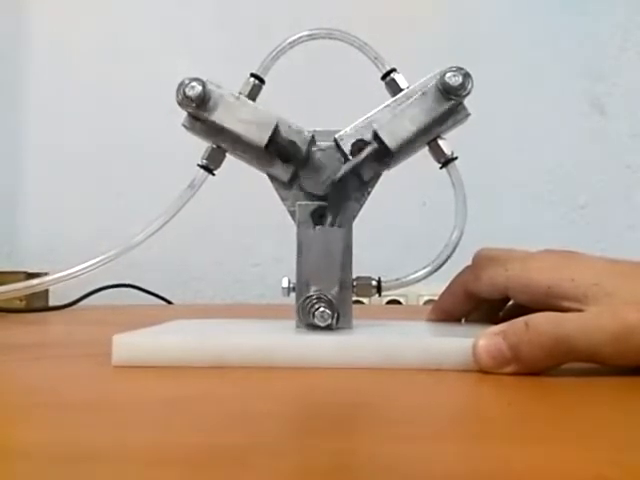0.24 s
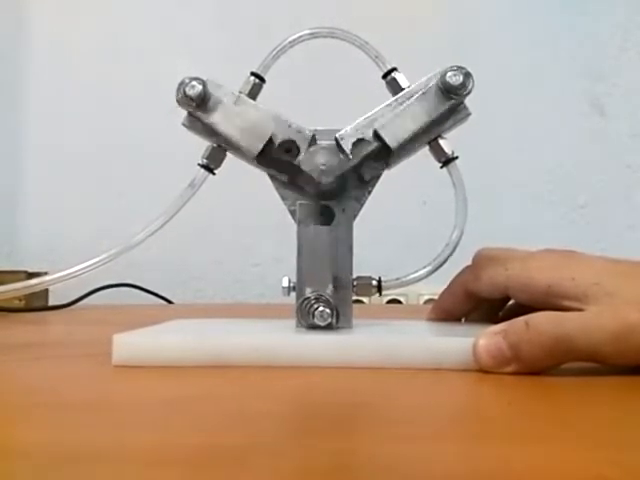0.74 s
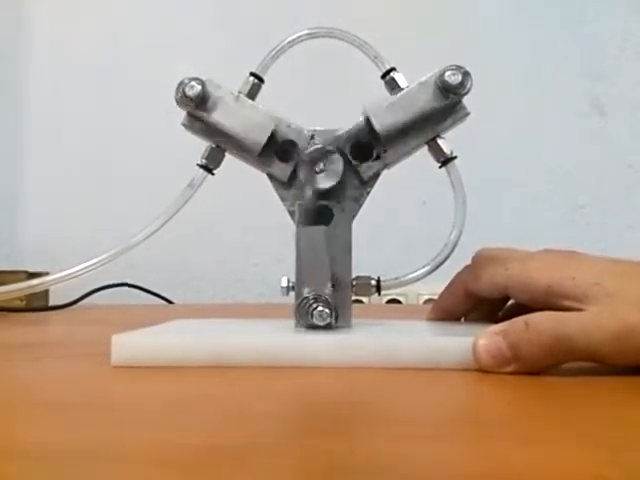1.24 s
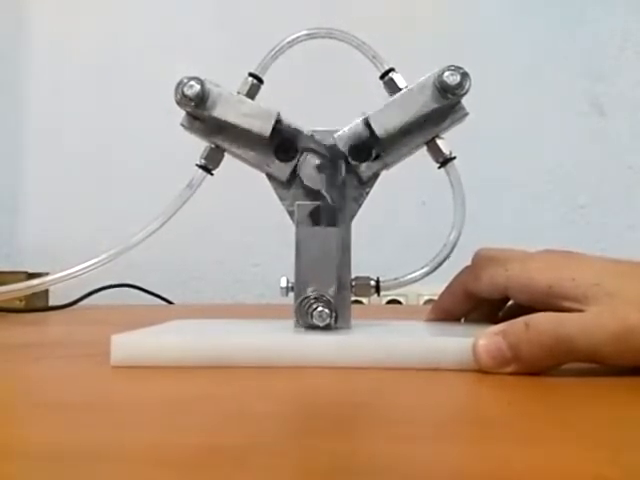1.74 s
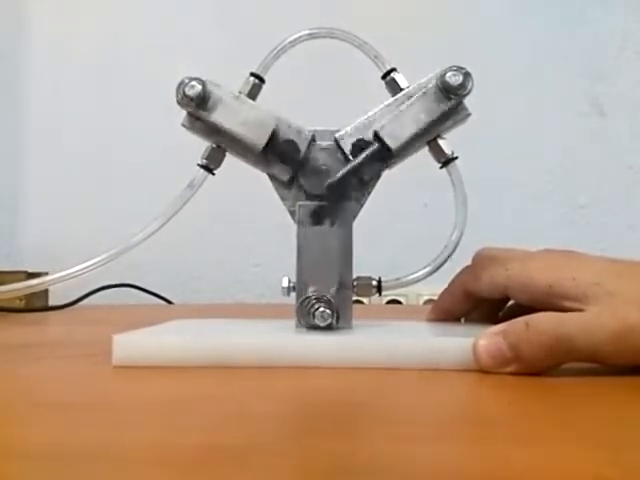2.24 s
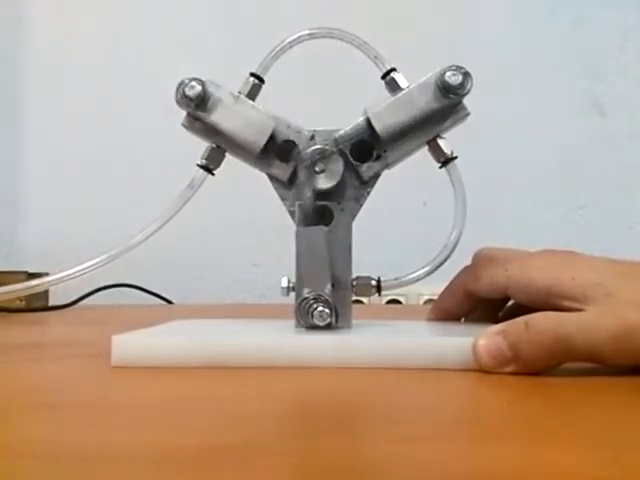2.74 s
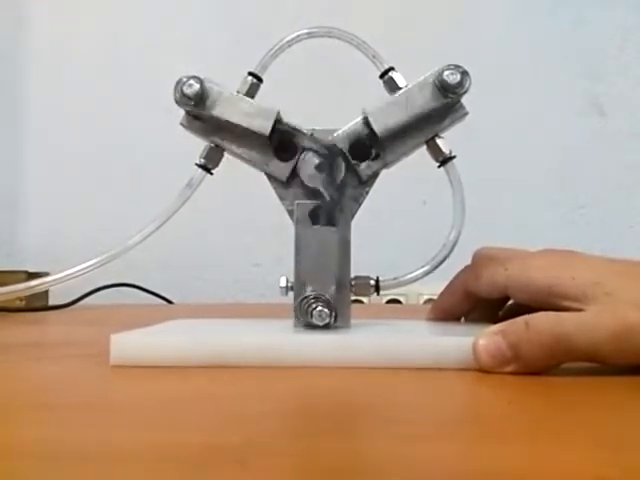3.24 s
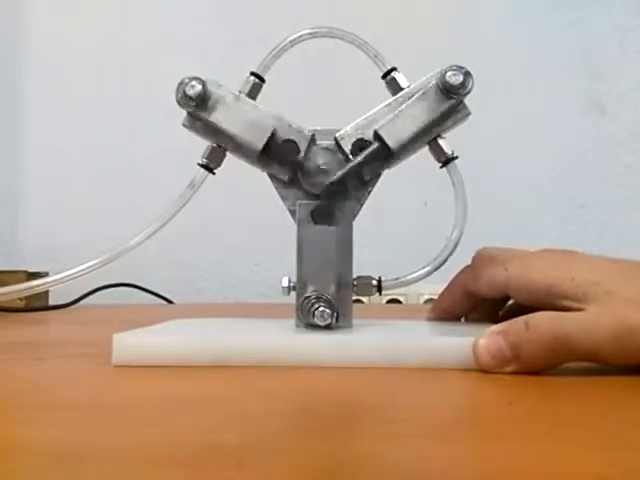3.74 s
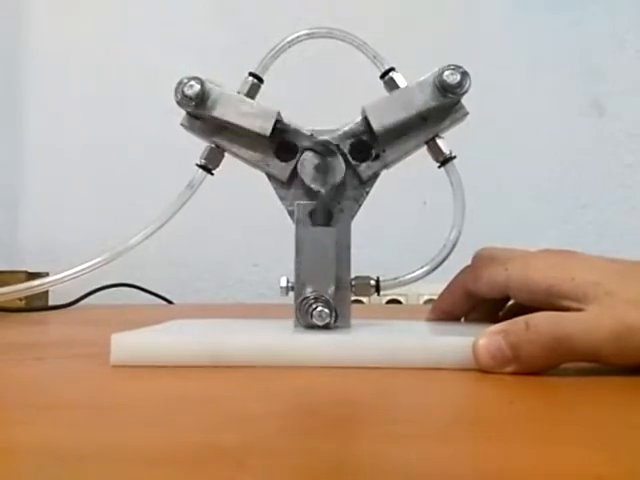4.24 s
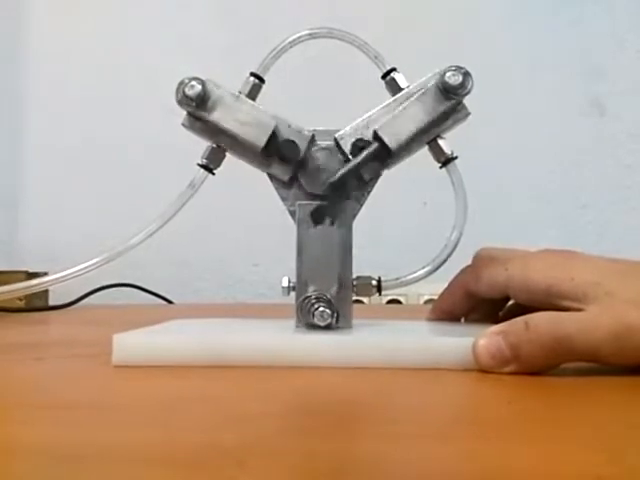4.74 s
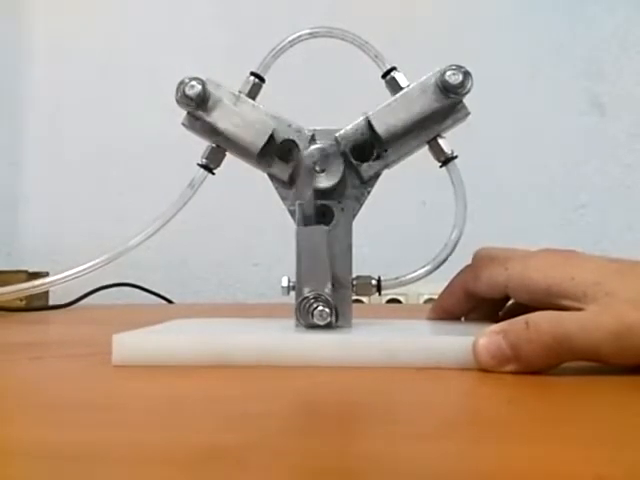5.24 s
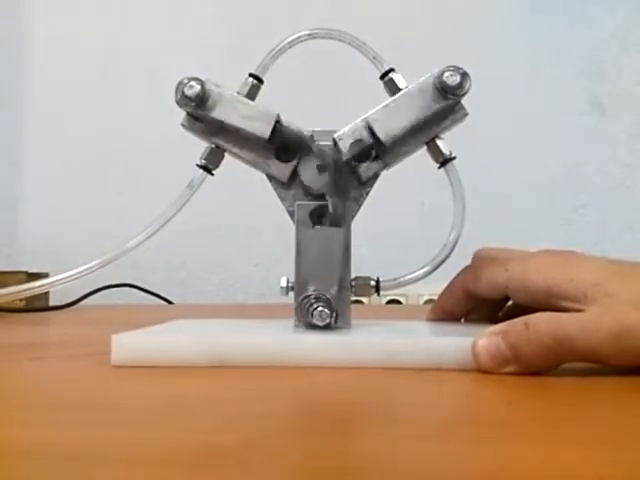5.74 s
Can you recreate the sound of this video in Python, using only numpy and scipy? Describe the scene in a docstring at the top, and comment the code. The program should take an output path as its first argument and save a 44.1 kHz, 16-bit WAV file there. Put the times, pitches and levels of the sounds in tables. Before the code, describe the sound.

A small compressed-air engine puffs almost five times a second, each sharp hiss sputtering out over a light table knock, with buzzing leaks between.

```python
"""On a table in a quiet room, a small three-cylinder compressed-air engine turns about 4.7 times a second, close to
a mono microphone. Once a turn a port snaps open: air flutters through it in fast pulses that ring near 8 kHz, then
breaks into slower sputters that knock the base against the table and set it swinging. Between the puffs the ports
leak with a rising buzz. Pulse trains and filtered noise make the air, resonances the knocks; a limiter holds the peaks."""
import sys
import numpy as np
from scipy import signal
from scipy.fft import rfft, irfft, next_fast_len
from scipy.io import wavfile
from scipy.ndimage import uniform_filter1d, minimum_filter1d, map_coordinates

SR = 44100
rng = np.random.default_rng(int(sys.argv[2]) if len(sys.argv) > 2 else 0)


def waveform_to_disk(signal):
    """Save audio, clipped to [-1, 1], as 16-bit WAV at the path in sys.argv[1]."""
    frames = np.transpose(np.atleast_2d(signal))
    scaled = np.clip(frames, -1, 1) * 32767
    samples = np.round(scaled).astype(np.int16)
    wavfile.write(sys.argv[1], SR, samples)


N = 263718
TIME = np.arange(N) / SR


def amp(db):
    """Decibels to gain."""
    return 10 ** (np.asarray(db) / 20)


def unit(x):
    """Scaled to rms 1."""
    return x / np.sqrt(np.mean(x ** 2) + 1e-20)


def noise():
    """White noise."""
    return rng.standard_normal(N)


def wobble(rate):
    """A smooth random curve through rate knots a second."""
    knots = rng.standard_normal(int(N * rate / SR) + 4)
    return map_coordinates(knots, [TIME * rate])


def filtered(x, response):
    """x times a complex response of frequency."""
    size = 2 * next_fast_len(N // 2 + SR // 4)
    return irfft(rfft(x, size) * response(np.fft.rfftfreq(size, 1 / SR)), size)[:N]


def coloured(x, spectrum):
    """x through a causal filter drawn by (Hz, dB) points, at rms 1."""
    def response(hz):
        f, db = np.transpose(spectrum)
        log_gain = np.log(amp(np.interp(np.log(hz + 1), np.log(f), db)))
        # folding the cepstrum forward in time gives minimum phase
        cepstrum = irfft(log_gain)
        cepstrum[1:len(cepstrum) // 2] *= 2
        cepstrum[len(cepstrum) // 2 + 1:] = 0
        return np.exp(rfft(cepstrum))
    return unit(filtered(unit(x), response))


# Hiss of the quiet room: f/Hz, relative level/dB
ROOM_COLOUR = [(30, -20), (120, 6.5), (400, -13.5), (1500, -13.5), (8000, -18.5)]


def room_floor():
    """Steady, faint filtered noise under everything."""
    return amp(-49.5) * coloured(noise(), ROOM_COLOUR)


# Low rumble of air brushing the microphone: f/Hz, relative level/dB
DRAUGHT_COLOUR = [(8, 1), (15, 4), (26, -6.5), (45, -11), (90, -23), (250, -50)]
DRAUGHT_DB, DRAUGHT_FOLLOWS = -42.5, 0.83  # base level at an average shake; dB more for each dB of shake


def draught(age, shake_db):
    """Spent air brushes the microphone as low noise, strong during the puff and fullest in the gap after it."""
    brush = np.interp(age, [0, .06, .12, .17, .2], [0.57, 0.94, 0.88, 1.0, 0.57])
    level = amp(DRAUGHT_DB + DRAUGHT_FOLLOWS * (shake_db - shake_db.mean()))  # harder strokes blow more
    return level * brush * amp(2.2 * wobble(12)) * coloured(noise(), DRAUGHT_COLOUR)


# One puff a turn: t/s the port opens, t/s from then to the main sputter, relative level/dB of the table's shake
PUFF_TIMES = [(-.085, .09, -38.5), (0.125, .066, -46.5), (.337, .068, -45.5), (.561, .072, -35.5),
              (.802, .074, -43.5), (1.036, .076, -52), (1.254, .075, -49), (1.473, .076, -42.5),
              (1.689, .068, -45), (1.902, .069, -50), (2.117, .072, -41), (2.333, .071, -33),
              (2.56, .078, -38.5), (2.763, .077, -45), (2.989, .064, -43), (3.206, .077, -41),
              (3.418, .077, -39), (3.616, .076, -41), (3.827, .063, -40), (4.026, .077, -32),
              (4.218, .073, -39), (4.422, .065, -37.5), (4.625, .063, -43), (4.836, .069, -44),
              (5.06, .071, -52), (5.277, .063, -38), (5.461, .065, -45.5), (5.687, .072, -39),
              (5.891, .07, -39)]
# Course of one turn: share of the turn [0-1], relative level/dB of the leak, flutter f/Hz,
# relative level/dB of the buzz tone
TURN_COURSE = [(0, -26, 400.3, -51), (.15, -21.5, 429.6, -56), (.35, -23.5, 359.6, -71),
               (.68, -23.5, 219.9, -45.5), (.79, -24, 270.4, -55), (.87, -19, 335.1, -43.5),
               (1, -21.5, 389.6, -44)]


def crank():
    """Turns the engine: time since the port opened, length of this turn, the puff's and the turn's columns."""
    starts, *puff = np.transpose(PUFF_TIMES)
    which = np.maximum(np.searchsorted(starts, TIME, side="right") - 1, 0)
    gaps = np.diff(starts)
    period = np.append(gaps, np.median(gaps))[which]
    age = TIME - starts[which]
    share, *course = np.transpose(TURN_COURSE)
    puff_now = [column[which] for column in puff]
    turn_now = [np.interp(age / period, share, column) for column in course]
    return age, period, puff_now, turn_now


THROB_HZ, THROB_RISE_S, THROB_PEAK_S, THROB_FALL_S = 67.2, 0.024, 0.082, 0.051  # mean pitch; swell after opening


def throb(age, sputter_s, shake_db, gain_db=6.5):
    """The sputters set the table swinging; the swing builds through the puff and dies after it."""
    width = np.where(age < THROB_PEAK_S, THROB_RISE_S, THROB_FALL_S)
    swell = np.exp(-((age - THROB_PEAK_S) / width) ** 2 / 2)
    pitch = THROB_HZ * np.exp(.09 * wobble(4))
    swing = 2 * np.pi * (age - sputter_s) * pitch + 0.81 * wobble(25)
    return -amp(shake_db + gain_db) * swell * (np.cos(swing) + 0.29 * np.cos(2 * swing))


# Resonances of the table: f/Hz, width f/Hz, relative level/dB
TABLE_MODES = [(70.6, 28, -32), (129, 52, -4), (212, 97, -11), (476, 160, -16.5), (920, 370, -24.5),
               (1700, 560, -29.5)]
# The base hops on some strokes: t/s of the first hop, relative level/dB, number of hops
BASE_JOLTS = [(.6337, -23.5, 3), (.8056, -26.5, 2), (0.8617, -21, 3), (1.31, -22, 3), (1.5376, -18, 3),
              (2.191, -22.5, 3), (2.4022, -18, 2), (2.8071, -26.5, 3), (3.0513, -23, 2), (3.249, -22.5, 2),
              (3.46, -24, 3), (3.6702, -23.5, 2), (3.8758, -23.5, 3), (4.103, -21, 2), (4.277, -24.5, 2),
              (4.903, -25.5, 2), (5.6978, -24, 2), (5.7426, -24.5, 2)]
HOP_S, HOP_LOSS_DB = .0148, 2  # time between hops; each lands softer


def table_response(f):
    """Parallel resonances, each ringing longer the narrower it is."""
    return sum(amp(db) * 1j * f * width / (centre * centre - f * f + 1j * f * width)
               for centre, width, db in TABLE_MODES)


def knocks(gain_db=44, rattle=0.085, rattle_s=0.0052):
    """Jolts make the base hop and rattle: impulses with short noise tails strike the table's resonances."""
    blows = np.zeros(N + SR)
    t = np.arange(SR // 50) / SR
    for start, db, hops in BASE_JOLTS:
        for hop in range(round(hops)):
            contact = (t == 0) + rattle * rng.standard_normal(len(t)) * np.exp(-t / rattle_s)
            first = round((start + hop * HOP_S) * SR)
            blows[first:][:len(t)] -= amp(db + gain_db - hop * HOP_LOSS_DB) * contact
    return filtered(blows[:N], table_response)


RING_HZ, RING_AT_FLUTTER_HZ, RING_FOLLOWS = 8123, 337, 0.17  # centre pitch; flutter it belongs to; exponent


def port_ring_hz(flutter_hz):
    """The port rings a little higher as it flutters faster."""
    return RING_HZ * (flutter_hz / RING_AT_FLUTTER_HZ) ** RING_FOLLOWS


def flutter(rate_hz, ring_hz, drift=.16, jitter=.014, ring_s=0.013, chirp=0.068, scatter_db=0.76, stray=.02):
    """Port faces lift and close hundreds of times a second: a click, a rising ring, a spurt, and a faint tone."""
    rate = rate_hz * np.exp(drift * wobble(16) + jitter * wobble(150))
    cycles = np.cumsum(rate) / SR
    phase = cycles % 1
    since = phase / rate  # seconds into this pulse
    size = amp(scatter_db * rng.standard_normal(N))[cycles.astype(int)]  # one draw a pulse
    samples_off = ((cycles + .5) % 1 - .5) / rate * SR
    clicks = size * np.sinc(samples_off) * rate_hz ** -.5  # even power at any rate
    wander = 1 + stray * wobble(35)
    pitch = ring_hz * wander * (1 + chirp * (phase - .5))
    onset = 1 - np.exp(-since / 0.00011)
    ring = size * np.sin(2 * np.pi * pitch * since) * np.exp(-since / ring_s) * onset
    spurts = size * (np.exp(-since / .0015) + .35)
    tone = np.sin(2 * np.pi * cycles + 1.4 * wobble(130))
    return (unit(clicks), unit(ring), unit(spurts)), unit(tone)


def cavity(x, echo=0.86):
    """Air repeats itself after drifting milliseconds, so a comb of narrow lines slides through the hiss."""
    delay = .0029 * SR * np.exp(.14 * wobble(5))  # in samples
    fine = signal.resample_poly(x, 4, 1)  # oversampled for smooth fractional delays

    def late(times):
        return np.interp(np.arange(N) - times * delay, np.arange(4 * N) / 4, fine)
    return unit(x + echo * late(0.99) + echo ** 2 * late(2))


def shifting(x, patchy_db=2.0):
    """The colour of the hiss shifts in small random patches of time and frequency."""
    z = signal.stft(x, nperseg=512)[2]
    patch = np.outer(np.hanning(13), np.hanning(15))
    field = signal.fftconvolve(rng.standard_normal(z.shape), patch, "same")
    return signal.istft(z * amp(patchy_db * unit(field)), nperseg=512)[1][:N]


def air(pulses, spectrum, click_db, ring_db, rush_db):
    """Fluttering air of rms 1: a blend of clicks, port ring and turbulence."""
    clicks, ring, spurts = pulses
    turbulence = spurts * cavity(noise())
    rush = coloured(amp(click_db) * clicks + amp(rush_db) * turbulence, spectrum)
    return unit(shifting(rush + amp(ring_db) * ring))


def buzz(buzz_db, tone):
    """The flutter's own tone, unsteady in level, heard as the rising buzz."""
    return amp(buzz_db - 4.0 + 3.7 * wobble(35)) * tone


# Short spits of the leak between puffs: t/s, relative level/dB, length t/s before the fall
LEAK_SPITS = [(1.22, -27, .01), (4.175, -11, 0.0053)]


def spits():
    """Extra flow of the leak, in short bursts."""
    return sum(amp(db) * np.interp(TIME - start, [0, .001, length, length + 0.0036], [0.0073, 0.59, 0.44, 0.022])
               for start, db, length in LEAK_SPITS)


# Colour of the leaking ports: f/Hz, relative level/dB
LEAK_COLOUR = [(60, -15), (300, -23.5), (600, -16), (1300, -29.5), (2500, -20), (3500, -25), (5000, -17.5),
               (6500, -10), (8000, -1), (9300, -5.5), (11000, -12), (12800, -15.5), (14500, -11),
               (16000, -7.5)]


def leak(leak_db, pulses):
    """Air escapes past the ports all through the turn, with the flutter's pulses in it."""
    flow = amp(leak_db - 3.0 + 1.0 * wobble(14)) + spits()
    return flow * air(pulses, LEAK_COLOUR, click_db=-14, ring_db=-6.0, rush_db=0.5)


WHISTLE_HZ, WHISTLE_WIDTH_HZ, WHISTLE_DB = 8140, 110, -10  # level relative to the broad jet


def whistle(waver_db=3.5):
    """The wide-open port whistles: a narrow, breathy noise band that wavers in level."""
    band = filtered(noise(), lambda hz: 1 / (1 + ((hz - WHISTLE_HZ) / WHISTLE_WIDTH_HZ) ** 2))
    return amp(WHISTLE_DB) * unit(unit(band) * amp(waver_db * wobble(5.04)))


# Colour of the opening port: f/Hz, relative level/dB
PORT_COLOUR = [(100, -10.5), (600, -15), (2500, -15), (3400, -17), (4700, -21.5), (5400, -6.5),
               (6700, -0.5), (8400, 10), (9700, 3), (11800, -9), (15000, 0), (16000, -12)]
# Colour of the sputtering jet: f/Hz, relative level/dB
JET_COLOUR = [(100, -15.5), (700, -19.5), (1900, -17), (3400, -18.5), (5000, -13.5), (6500, -7), (7700, 7),
              (8700, 1.5), (10000, -5), (12500, -5.5), (14500, -4), (16000, -9.5)]
# Colour of the cylinder's rasp: f/Hz, relative level/dB
RASP_COLOUR = [(60, -25), (170, 12.5), (400, -3.5), (750, 1), (1100, -3), (1900, 1), (2200, -1.5),
               (2550, 4.5), (3300, -13.5), (4200, 0.5), (6000, -19.5), (16000, -41)]
BLOW_DB, RASP_DB = -13, -32  # base levels of jet and rasp, alike on every stroke
BLAST_DB, BLAST_S = 2.5, 0.016  # first rush of pent-up air, and how fast it fades
OPEN_SHARE = .49  # share of the turn for which the port blows
SAG_DB, SAG_AT_S, SAG_WIDTH_S = 4, 0.034, 0.0071  # flow sags between the opening blast and the sputters
SPUTTER_HZ = 60.7  # mean rate of the sputters


def exhaust(age, period, sputter_s, pulses):
    """The puff goes from tight buzz to broad jet, chopped ever deeper into sputters; the cylinder rasps below."""
    opening = np.clip(age / 0.00046, 0, 1) * amp(BLAST_DB * np.exp(-age / BLAST_S))
    past_end = (age - OPEN_SHARE * period + 0.0048) / 0.0096
    emptying = 1 / (1 + np.exp(np.clip(past_end, -30, 30)))
    sag = amp(-SAG_DB * np.exp(-((age - SAG_AT_S) / SAG_WIDTH_S) ** 2))
    loose = np.clip((age - .022) / 0.033, 0, 1)  # share of the broad jet as the port swings wide open
    sputter_rate = SPUTTER_HZ * np.exp(0.087 * wobble(4.04))
    beat = np.cos(2 * np.pi * (age - sputter_s) * sputter_rate + 0.32 * wobble(40))
    depth_db = np.interp(age, [0, .035, .06, .095], [1, 7, 14, 18])
    chop = amp(2.5 - depth_db * ((1 - beat) / 2) ** 1.45 + 2.05 * wobble(110))
    tight = air(pulses, PORT_COLOUR, click_db=-7, ring_db=-4.5, rush_db=1.5)
    broad = amp(1) * (air(pulses, JET_COLOUR, click_db=-10, ring_db=-28, rush_db=-3.5) + whistle())
    rough = air(pulses, RASP_COLOUR, click_db=-1.5, ring_db=-40, rush_db=1)
    rasp = amp(RASP_DB) * unit(shifting(rough, patchy_db=2.0))
    jet = np.sqrt(1 - loose) * tight + np.sqrt(loose) * broad  # equal-power crossfade
    return opening * emptying * sag * chop * (amp(BLOW_DB) * jet + rasp)


def walls(x, wet_db=-16, t60=0.36):
    """The table top and the wall behind add a short, dense echo: a decaying noise tail."""
    t = np.arange(SR // 4) / SR
    tail = rng.standard_normal(len(t)) * amp(-60 * t / t60) * (t > .002)
    return x + amp(wet_db) * signal.fftconvolve(x, tail / np.linalg.norm(tail))[:N]


def scene():
    """Puffs, leak, buzz, knocks and table throb in a quiet room; both channels alike."""
    age, period, (sputter_s, shake_db), (leak_db, flutter_hz, buzz_db) = crank()
    pulses, tone = flutter(flutter_hz, port_ring_hz(flutter_hz))
    background = room_floor() + draught(age, shake_db)
    table = knocks() + throb(age, sputter_s, shake_db)
    blowing = walls(exhaust(age, period, sputter_s, pulses) + leak(leak_db, pulses))
    mono = blowing + buzz(buzz_db, tone) + table + background
    return np.array([mono, mono])


TOP_HZ = 15900  # band limit


def record(dry, hold_s=0.00069):
    """A fast limiter holds the peaks; nothing is kept above the band limit."""
    ceiling_db = -9.3
    needed = np.minimum(1, amp(ceiling_db) / (np.abs(dry[0]) + 1e-9))
    size = max(int(hold_s * SR), 2)
    gain = uniform_filter1d(minimum_filter1d(needed, size), size)
    mono = filtered(dry[0] * gain, lambda hz: hz < TOP_HZ)
    return np.array([mono, mono])


dry = scene()
out = record(dry)
waveform_to_disk(out)
```